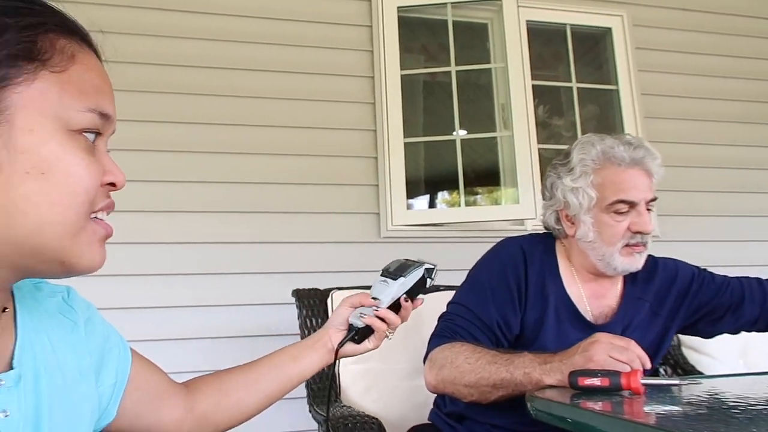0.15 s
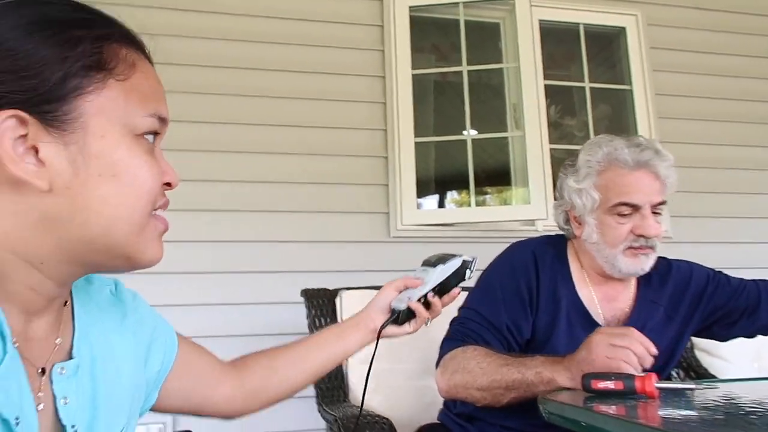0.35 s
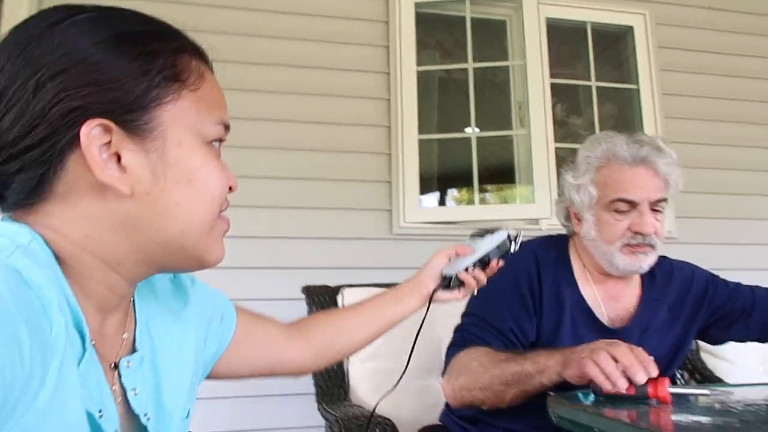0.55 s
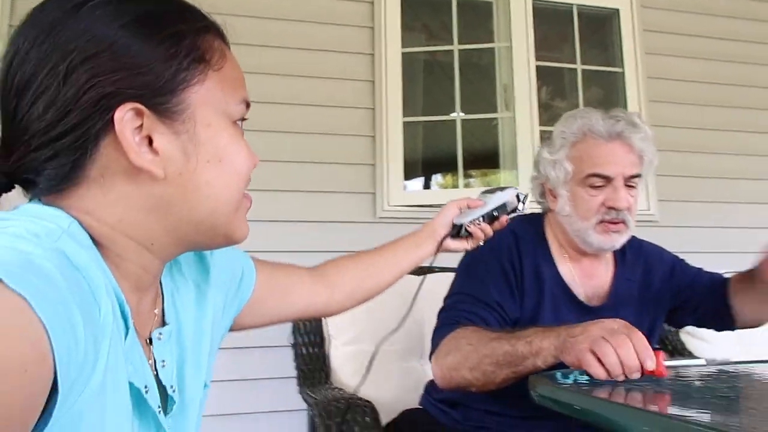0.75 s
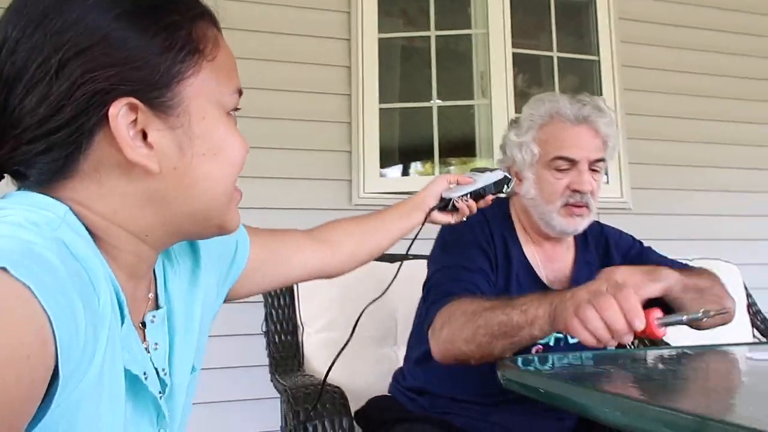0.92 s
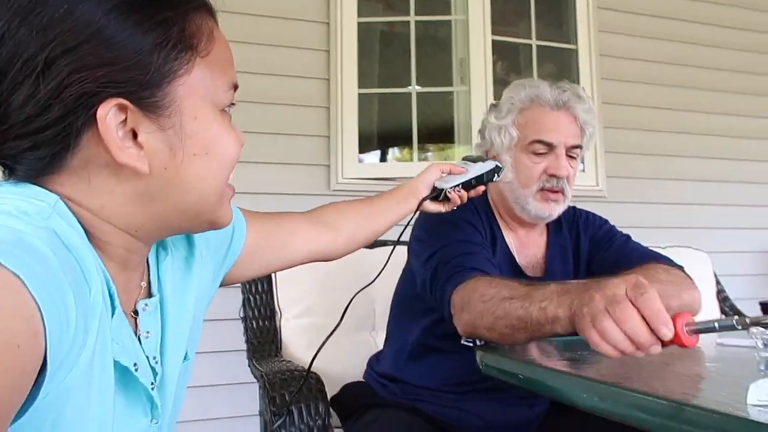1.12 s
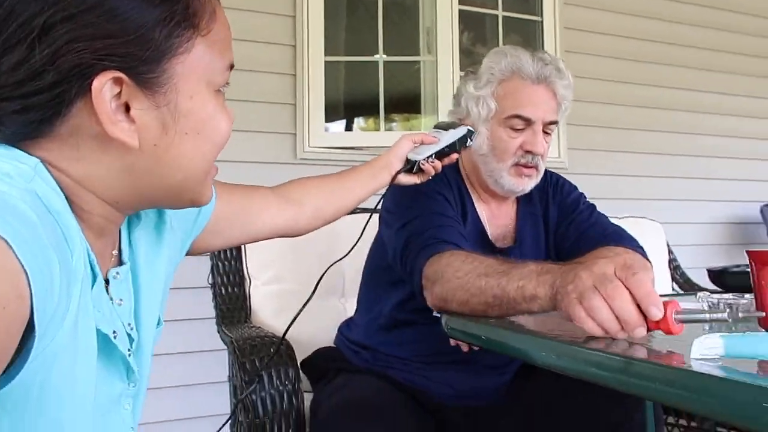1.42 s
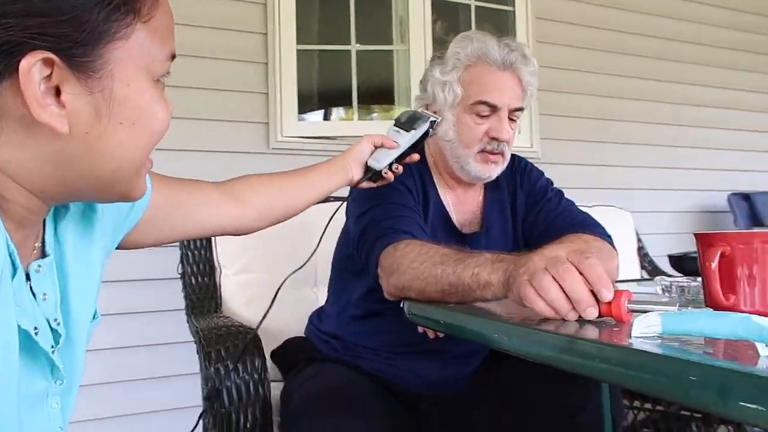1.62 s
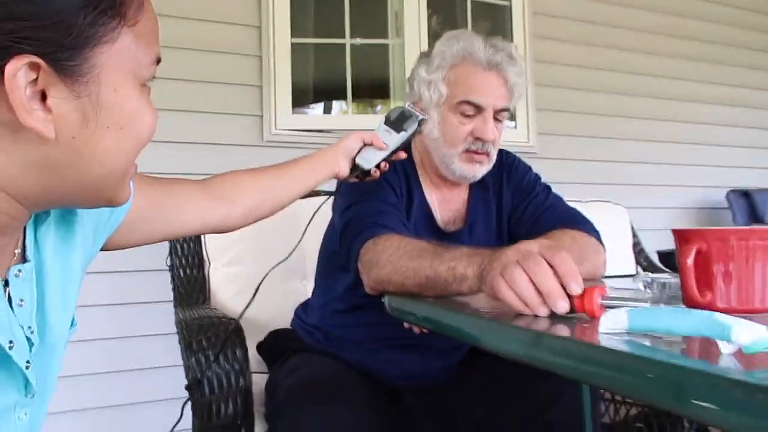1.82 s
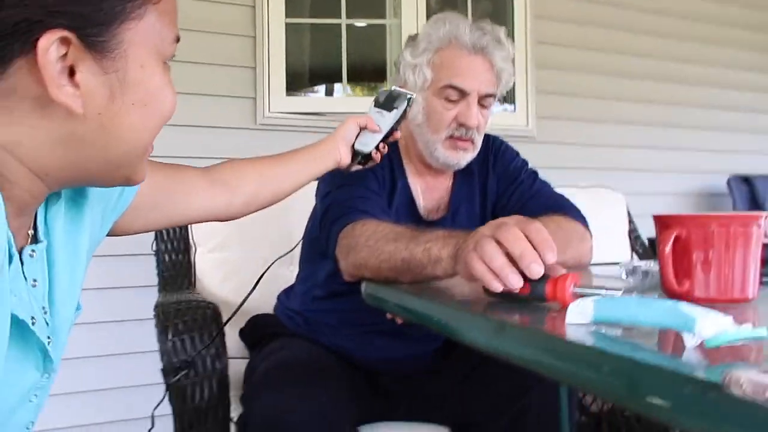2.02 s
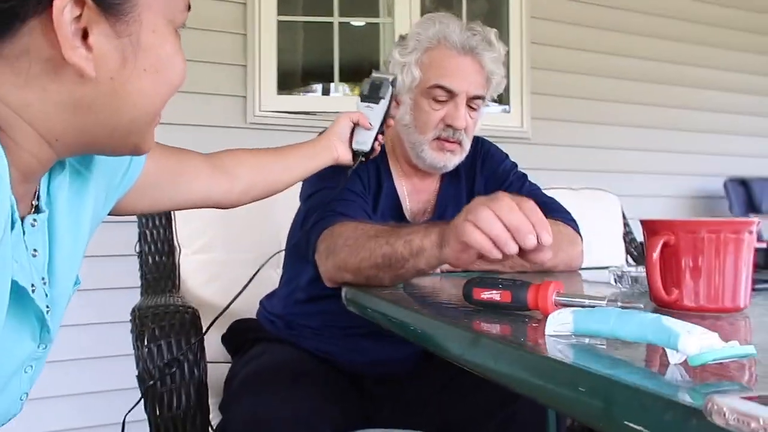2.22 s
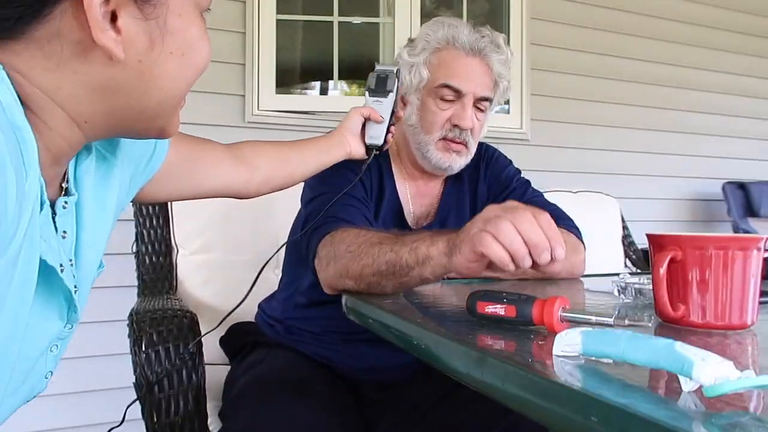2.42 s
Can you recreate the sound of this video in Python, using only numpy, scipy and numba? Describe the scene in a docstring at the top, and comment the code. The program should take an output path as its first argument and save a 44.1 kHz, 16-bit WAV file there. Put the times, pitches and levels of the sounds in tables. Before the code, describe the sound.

Hair clippers buzz throughout, already running, a low 120-hertz electric drone with raspy edge, changing colour as the hand moves. At 0.2 s a scrape and thump lead into a hard, bright tool clatter on the table, right of centre, until about 0.5 s; the level dips, then recovers. A soft double knock comes at 1.65 s, then scrape, dull thumps and sharp click around 2.0-2.1 s. Short porch reverberation, faint rumble and hiss.

```python
"""Mains-driven hair clippers buzz in a moving hand on a porch: summed multiples of the stroke rate plus a rasp.
A dropped tool clatters on the table, later come a knock and a sharp click: damped modes struck by ticks.
Scrapes are swelling rattles, and early and late dull thumps are soft pushes on the table modes.
Rumble and hiss are shaped noise; a gain control ducks the level after loud sound."""
import sys
import numpy as np
from scipy import signal
from scipy.fft import rfft, irfft
from scipy.io import wavfile
from scipy.ndimage import uniform_filter1d
from numba import njit

SR = 44100
rng = np.random.default_rng(int(sys.argv[2]) if len(sys.argv) > 2 else 0)


def magnitude_from_level(level_db):
    """Linear magnitude for a level in decibels (20 dB per decade)."""
    exponent = np.asarray(level_db, float) / 20
    return 10 ** exponent


def generate_wav(signal):
    """Clip the signal to [-1, 1] and save it as 16-bit WAV at the path in sys.argv[1]."""
    frames = np.transpose(np.atleast_2d(signal))
    scaled = np.clip(frames, -1, 1) * 32767
    pcm = np.round(scaled).astype(np.int16)
    wavfile.write(sys.argv[1], SR, pcm)


N = 112454  # length in samples

# Relative strength of multiples 1, 2, 3 .. of the stroke rate: [level/dB]
MULTIPLE_DB = [-10, -20, -21.5, -37, -4.5, -17, 3, -24, -8, -21, -14, -22, -4.5, -12, -9.5, -11.5, -8.5,
               -18, -6.5, -25.5, -13, -25, -11.5, -15.5, -12.5, -9, -8.5, -20.5, -19.5, -17.5, -23.5, -15,
               -25, -20, -16.5, -21.5, -25, -21, -25, -32, -27, -27, -29.5, -30, -20.5, -29, -19, -27,
               -23.5]
# Envelope of the higher multiples: [f/Hz, level/dB]
HIGH_MULTIPLES = [(6000, -23), (7500, -11), (7960, -8), (8600, -17), (12000, -39)]
# Clippers as the hand turns them: [t/s, level/dB, gains of the four groups below/dB (4 columns), treble gain/dB]
HAND_TURNS = [(0, -33.5, -1.5, 6.5, 0.5, -1, -9.5), (.55, -36.5, 7, 4, -3.5, 9.5, -3.5),
              (.8, -35.5, 0.5, -3.5, 3, 6, -3), (1.0, -33.5, 2, -0.5, -4.5, 3, -6),
              (1.25, -34, 3, 0.5, -1, 0.5, -2.5), (1.5, -33, 2, -0.5, -2.5, 8, -3),
              (1.62, -33, 3, 3, -7, -1.5, -2.5), (1.76, -30.5, 2, 0, 3.5, -7, -3.5),
              (1.95, -34, 5, 2, 3.5, -2, -0.5), (2.2, -31.5, -3, 0, 5, -6, -2),
              (2.38, -31.5, -10.5, -6.5, 5, -3, -3.5)]
# Multiples that swell and fade together: [multiple numbers], one row a group
SWELL_GROUPS = [(9, 11), (6, 10, 14, 15), (17, 19, 21, 23, 25), (20, 24, 27)]
# Spectrum of the blade rasp: [f/Hz, level/dB]
RASP_SPECTRUM = [(200, -12.5), (500, -20), (1000, -19.5), (3200, -17.5), (4500, -23.5), (7000, -35.5),
                 (11000, -46), (15000, -43)]
# Spectrum of the outdoor air: [f/Hz, level/dB]
AIR_SPECTRUM = [(15, -33), (30, -6), (70, -8), (118, -2), (200, -13), (500, -22), (1500, -33), (6000, -29),
                (15000, -44)]
# Swell of the rumble: [t/s, level/dB]
RUMBLE_SWELL = [(0, -5), (.5, 6.5), (1.25, -8), (1.5, 7.5), (2.1, 12), (2.55, -3)]
# Modes of the tool: [f/Hz, level/dB, t60/s]
TOOL_MODES = [(1487, -1, 0.0086), (1700, 1, 0.017), (1901, -0.5, 0.016), (2100, -3, 0.021),
              (2380, -7.5, 0.023), (2483, -4.5, 0.024), (2750, -3.5, 0.0089), (3007, -13.5, 0.038),
              (3277, -9, 0.017), (3720, 0, 0.0032)]
# Modes of the table top: [f/Hz, level/dB, t60/s]
TABLE_MODES = [(78.3, -9, 0.41), (107.6, -25, 0.82), (128.5, -6, 0.071), (161.6, 1, 0.055), (296, 0, 0.062),
               (328.5, -2.5, 0.075), (397.5, 4.5, 0.03), (522, 2.5, 0.034), (659.4, 5.5, 0.034),
               (903, 4.5, 0.03), (1072, 5.5, 0.027), (1330, 6, 0.0088)]
# Spectrum of the crack of hard contact: [f/Hz, level/dB]
CRACK_SPECTRUM = [(2500, -5), (4200, 0.5), (7000, -7), (15000, -28.5)]
# Hits: [t/s, tool level/dB, f of tool emphasis/Hz, table level/dB, rattle t60/s, crack level/dB]
HIT_LIST = [(.2245, 3, 2750, -30, 0.054, -20), (.226, 4, 2730, -11.5, 0.028, -14),
            (0.2309, -6, 2480, -18.5, 0.42, -16), (0.2866, -0.5, 2800, -16, 0.16, -43),
            (.295, -6.5, 1900, -7.5, 0.22, -31), (0.3595, -2, 2750, -11.5, 0.22, -30.5),
            (0.3849, -0.5, 2600, -10, 0.12, -23), (.393, -9, 2100, -7.5, 0.22, -21),
            (1.652, -9.5, 3120, -12, 0.087, -40), (1.657, -9, 2600, -8.5, 0.14, -35),
            (2.0749, 2.5, 2070, -15, 0.00091, -39), (2.0828, -11.5, 1730, -23, 0.019, -39),
            (2.0875, -3, 1650, -14, 0.065, -38), (2.0995, -23, 1800, -11, 0.11, -28.5)]
# Scrapes: [t/s, swell length/s, tool level/dB, table level/dB]
SCRAPE_LIST = [(0.19, 0.056, -17.5, -21), (0.703, 0.056, -29.5, -31), (1.403, 0.1, -40, -38.5),
               (1.98, 0.097, -19, -22)]
# Thumps: [t/s, peak level before the bass cut/dB, push length/s]
THUMP_LIST = [(0.203, -18, 0.0019), (0.727, -35, 0.0011), (1.98, -15.5, 0.0033), (2, -6.5, 0.0055),
              (2.029, -11, 0.0067)]

STROKE_HZ = 120.01  # blade cycles per second, twice the mains
HIGH_DB, START_SPREAD_S = -23.5, 0.001223  # level of the high multiples; scatter of start times
WANDER_DB, WANDER_PER_S = 2.2, 2.5
RASP_DB, AIR_DB = -12, -47
RATTLE_PER_S, RATTLE_DB = 4000, -13.5
FOCUS_OCT = 0.48  # distance from the emphasis at which a tool mode is 10 dB down
HELD_DB_PER_S, MIDDLE_HZ = 1500, 556  # damping by a hand; table pitch where the held hits land
CRACK_T60_S, TOOL_TOP_HZ, BASS_CUT_HZ = 0.023, 3950, 113
EARLY_RIGHT, LATER_RIGHT = 0.5, 0.25  # positions, 0 centre to 1 right
PORCH_T60_S, PORCH_DB, PORCH_HZ = 0.36, -12.5, 1620
PORT_LAG_S, PAN_DB, SHADE_HZ = 9e-5, 14.5, 2000  # lag and treble difference for a source fully right
DUCK_ABOVE_DB, DUCK_SHARE = -24.5, 0.83  # threshold; dB of ducking per dB above it
DUCK_ATTACK_S, DUCK_RELEASE_S, METER_S = 0.041, 0.55, 0.12


def colour(x, points):
    """Linear filtering: weights the spectrum by (f/Hz, level/dB) points, then sets the rms to 1."""
    hz, db = np.array(points).T
    f = np.arange(x.shape[-1] // 2 + 1) * SR / x.shape[-1] + 1
    gain = magnitude_from_level(np.interp(np.log(f), np.log(hz), db))
    y = irfft(rfft(x) * gain, x.shape[-1])
    return y / np.sqrt(np.mean(y ** 2))


def butter(x, order, hz, kind="low"):
    """Butterworth filtering: a maximally flat pass band."""
    return signal.sosfilt(signal.butter(order, hz, kind, fs=SR, output="sos"), x)


def walk(rate, count=1):
    """Low-pass random process: held random values smoothed twice, spread near 1."""
    k = int(SR / rate)
    steps = np.repeat(rng.standard_normal((count, N // k + 1)), k, axis=1)
    return 1.3 * uniform_filter1d(uniform_filter1d(steps, k), k)[:, :N]


def place(x, right):
    """Interaural-style cues at two close ports: from the right, the left hears later with shaded treble."""
    f = np.arange(len(x) // 2 + 1) * SR / len(x)
    shade = magnitude_from_level(right * PAN_DB / 2 * f ** 2 / (f ** 2 + SHADE_HZ ** 2))
    half = shade * np.exp(1j * np.pi * f * right * PORT_LAG_S)
    return irfft(rfft(x) * np.array([1 / half, half]), len(x))


def add(out, x, s):
    """Superposition: adds x into out from s seconds on."""
    i = int(s * SR)
    out[:, i:i + x.shape[1]] += x[:, :N - i]


def clippers():
    """Periodic impact: the blade slams left and right, giving mostly odd multiples and a rasp at each turn."""
    t, hand = np.arange(N) / SR, np.array(HAND_TURNS)
    level_db, *group_db, treble_db = (np.interp(t, hand[:, 0], c) for c in hand.T[1:])
    high = np.arange(len(MULTIPLE_DB) + 1, 100)
    scatter = rng.standard_normal((100, 2))
    envelope_db = np.interp(high * STROKE_HZ, *np.array(HIGH_MULTIPLES).T)
    high_db = HIGH_DB + envelope_db + 5 * scatter[high, 0]
    multiples = list(enumerate(MULTIPLE_DB, 1)) + list(zip(high, high_db))
    drift, buzz = walk(WANDER_PER_S, count=len(multiples)), 0
    for (m, db), d, late in zip(multiples, drift, scatter[:, 1]):
        hz = m * STROKE_HZ
        turn_db = sum(curve for curve, group in zip(group_db, SWELL_GROUPS) if m in group)
        wander_db = WANDER_DB * d * min(hz / 2000, 1)
        gain = magnitude_from_level(db + turn_db + treble_db * (hz > 3700) + wander_db)
        phase = 2 * np.pi * hz * (t - START_SPREAD_S * late) + 0.043 * d
        buzz = buzz + gain * np.cos(phase)
    gate = 1 + .5 * np.cos(4 * np.pi * STROKE_HZ * t)  # two turns a cycle
    noise = colour(rng.standard_normal((2, N)), RASP_SPECTRUM)
    mid, side = gate * noise * magnitude_from_level(treble_db / 2)
    rasp = mid + 0.48 * butter(side, 4, 4500, "high") * np.array([[1], [-1]])
    return magnitude_from_level(level_db) * (place(buzz / buzz.std(), 0.078) + magnitude_from_level(RASP_DB) * rasp)


def air():
    """Broadband noise: an outdoor rumble that swells, and a faint wide hiss."""
    mid, side = colour(rng.standard_normal((2, N)), AIR_SPECTRUM)
    swell_db = np.interp(np.arange(N) / SR, *np.array(RUMBLE_SWELL).T)
    swell = magnitude_from_level(swell_db + 5.1 * walk(6.77)[0])
    mid = swell * butter(mid, 4, 1500) + butter(mid, 4, 1500, "high")
    side = 1.44 * butter(side, 4, 4700, "high") + 0.99 * butter(side, 4, [250, 700], "band")
    return magnitude_from_level(AIR_DB) * (mid + side * np.array([[1], [-1]]))


def ring(modes, weight_db, alternate=True):
    """Modal superposition: damped sines, neighbours in opposite sense if alternate; peak 1."""
    t, (hz, db, t60) = np.arange(SR // 4) / SR, np.array(modes).T[:, :, None]
    sign = (-1) ** (alternate * np.arange(len(modes))[:, None])
    decay = np.exp(-np.log(1000) * t / t60)
    h = (sign * magnitude_from_level(db + weight_db) * np.sin(2 * np.pi * hz * t) * decay).sum(axis=0)
    return h / abs(h).max()


def rattle(t):
    """Random point process: ticks of random size at random moments."""
    return (rng.random(len(t)) < RATTLE_PER_S / SR) * rng.standard_normal(len(t))


def struck(push, db, hz, table_db, crack_db, held=False):
    """Convolution of a push with the tool and table modes; hard contact adds a bright crack."""
    t = np.arange(SR // 4) / SR
    vary_db = 1.5 * rng.standard_normal((len(TOOL_MODES) + len(TABLE_MODES), 1))
    octaves = np.log2(np.array(TOOL_MODES)[:, :1] / hz)
    focus_db = np.maximum(-10 * (octaves / FOCUS_OCT) ** 2, -10 - 10 * held)
    # a held tool is struck sharply: its modes start in the same sense and the hand damps them
    tool = ring(TOOL_MODES, focus_db + vary_db[:len(TOOL_MODES)], not held)
    tool = tool * magnitude_from_level(-held * HELD_DB_PER_S * t)
    upper = TABLE_MODES[3:]
    spot_db = -held * 10 * np.log2(np.array(upper)[:, :1] / MIDDLE_HZ) ** 2
    table = ring(upper, spot_db + vary_db[len(TOOL_MODES) + 3:])
    body = butter(magnitude_from_level(db) * tool + magnitude_from_level(table_db) * table, 4, TOOL_TOP_HZ)
    crack = colour(rng.standard_normal(len(t)), CRACK_SPECTRUM) * magnitude_from_level(crack_db - 60 * t / CRACK_T60_S)
    return signal.fftconvolve(push, body + crack)


def thump(db, length):
    """Low-pass excitation: a soft, smooth push on all the table modes, alike left and right."""
    push = np.hanning(int(length * SR) + 2)
    h = signal.fftconvolve(push, ring(TABLE_MODES, 2 * rng.standard_normal((len(TABLE_MODES), 1))))
    return magnitude_from_level(db) * h[None] / abs(h).max() * np.ones((2, 1))


def knocks():
    """Excitation of resonators: hits are a tick and a fading rattle, scrapes a swelling rattle, thumps soft."""
    out, t = np.zeros((2, N)), np.arange(SR // 3) / SR

    def put(x, s):
        right = EARLY_RIGHT if s < .6 else LATER_RIGHT
        add(out, place(x, right)[:, :SR // 2], s)

    for s, db, hz, table_db, t60, crack_db in HIT_LIST:
        push = rattle(t) * magnitude_from_level(RATTLE_DB - 60 * t / t60)
        push[0] = 1  # the tick
        put(struck(push, db, hz, table_db, crack_db, held=s > 2), s)
    for s, length, db, table_db in SCRAPE_LIST:
        swell = t / length * np.exp(-4 * t / length) * 10
        push = magnitude_from_level(RATTLE_DB) * rattle(t) * swell
        put(struck(push, db, 2890, table_db, db - 18.5), s)
    for s, db, length in THUMP_LIST:
        add(out, thump(db, length), s)
    return butter(out, 2, BASS_CUT_HZ, "high")


def porch(x):
    """Reverberation: wall, floor and ceiling give a short dull tail, alike left and right in the bass."""
    t = np.arange(SR // 2) / SR
    noise = colour(rng.standard_normal((2, len(t))), [(100, -6), (PORCH_HZ, 0), (12000, -15)])
    h = noise * magnitude_from_level(-60 * t / PORCH_T60_S) * (t > .007)
    h[1] = butter(h[1], 2, 2500, "high")
    h = h / np.sqrt(np.sum(h[0] ** 2))
    mid, side = signal.fftconvolve(x.mean(axis=0)[None], h, axes=1)[:, :N]
    return magnitude_from_level(PORCH_DB) * (mid + 0.11 * side * np.array([[1], [-1]]))


def scene():
    """Superposition of clippers, air, and knocks with their reverberation."""
    hits = knocks()
    return clippers() + air() + hits + porch(hits)


@njit
def follow(x, up, down):
    """First-order relaxation with separate rising and falling rates per sample."""
    y, e = np.empty(len(x)), 0.
    for i in range(len(x)):
        e += (x[i] - e) * (up if x[i] > e else down)
        y[i] = e
    return y


def low_pass(x):
    """Removes everything above the highest recorded frequency."""
    return signal.sosfilt(signal.butter(12, 15700, fs=SR, output="sos"), x)


def record(dry):
    """Automatic gain control: loud sound ducks the gain, which recovers slowly; peaks clip."""
    n = int(METER_S * SR)
    power = uniform_filter1d(np.mean(dry ** 2, axis=0), n, origin=(n - 1) // 2)  # over the past window
    meter_db = 10 * np.log10(power + 1e-12)
    target_db = DUCK_SHARE * np.maximum(meter_db - DUCK_ABOVE_DB, 0)
    duck_db = follow(target_db, 1 / (DUCK_ATTACK_S * SR), 1 / (DUCK_RELEASE_S * SR))
    mix = np.clip(dry * magnitude_from_level(-duck_db), -1, 1)
    return low_pass(mix)


dry = scene()
out = record(dry)
generate_wav(out)
```